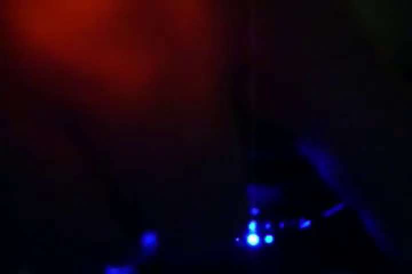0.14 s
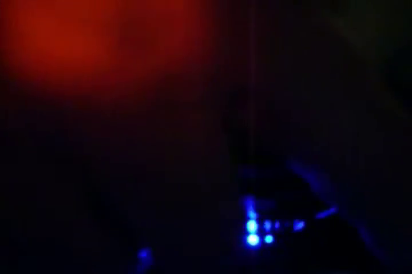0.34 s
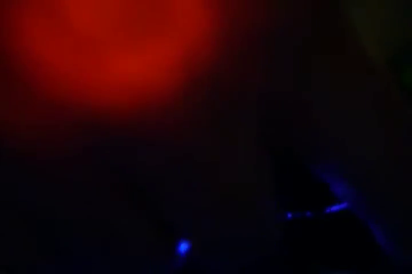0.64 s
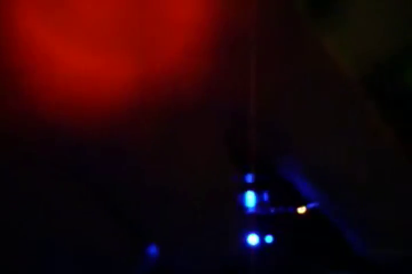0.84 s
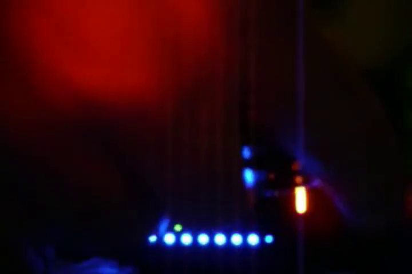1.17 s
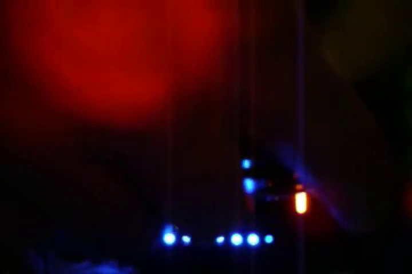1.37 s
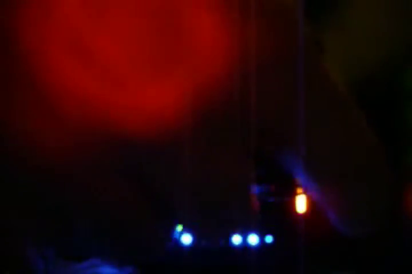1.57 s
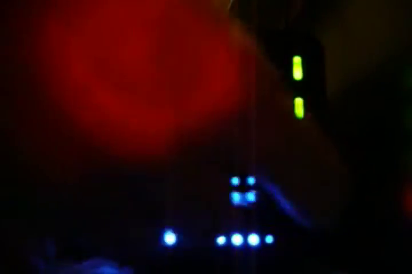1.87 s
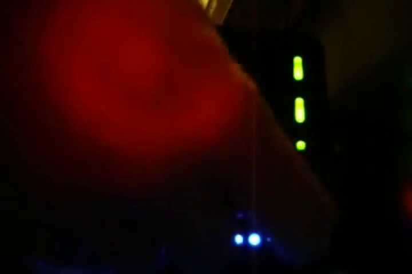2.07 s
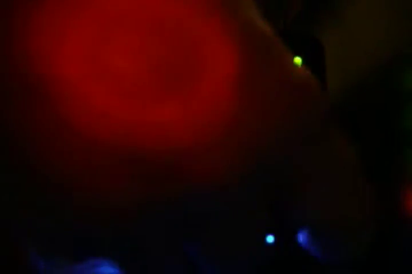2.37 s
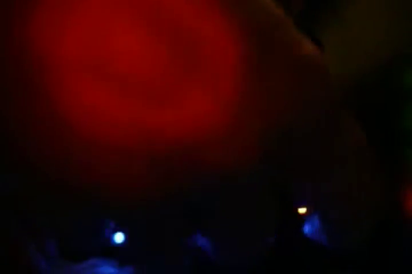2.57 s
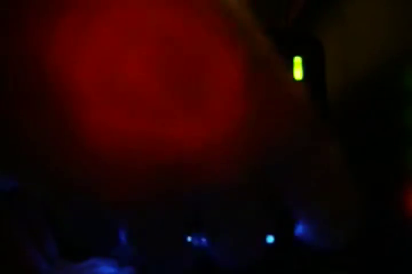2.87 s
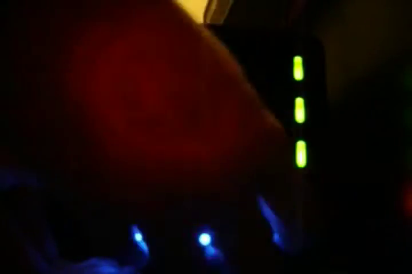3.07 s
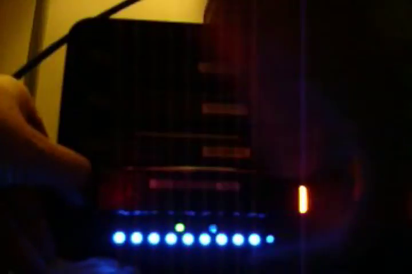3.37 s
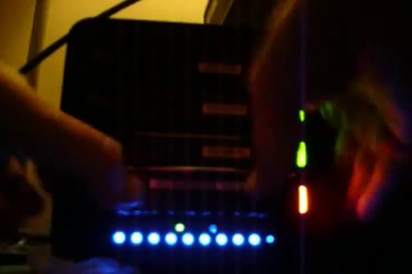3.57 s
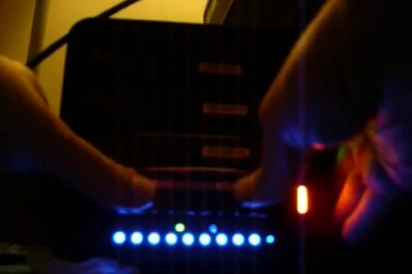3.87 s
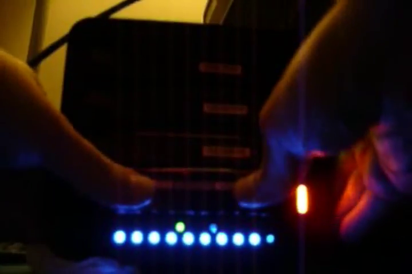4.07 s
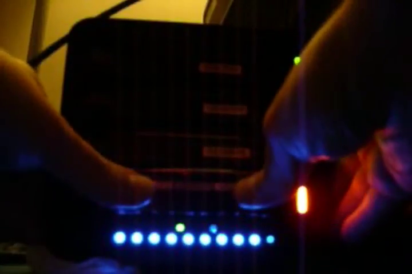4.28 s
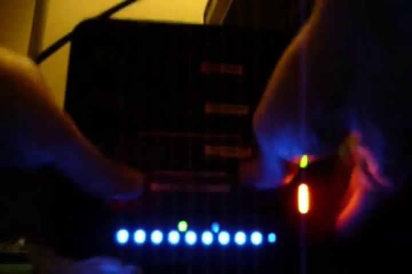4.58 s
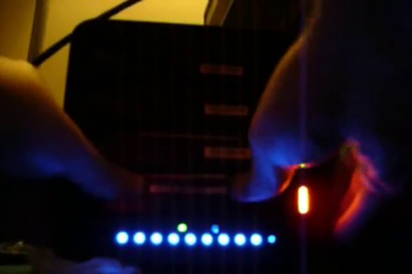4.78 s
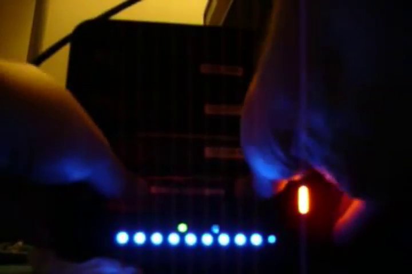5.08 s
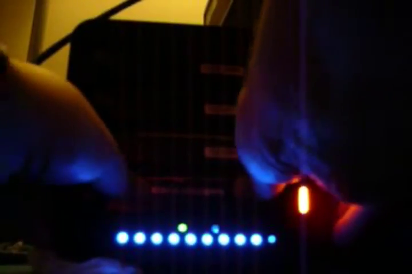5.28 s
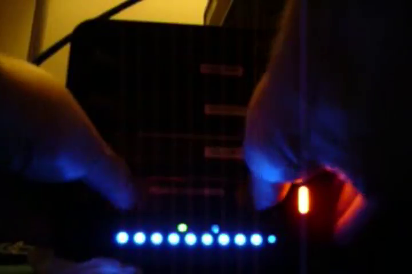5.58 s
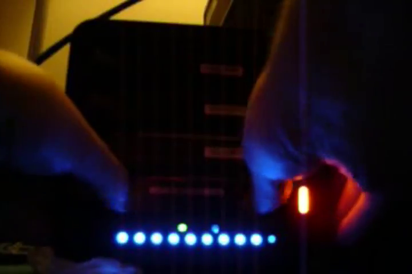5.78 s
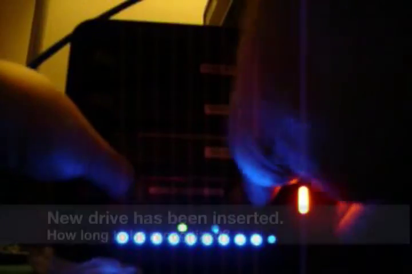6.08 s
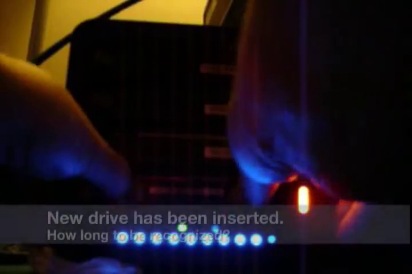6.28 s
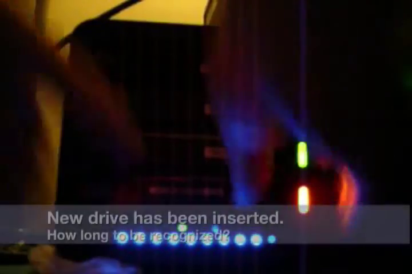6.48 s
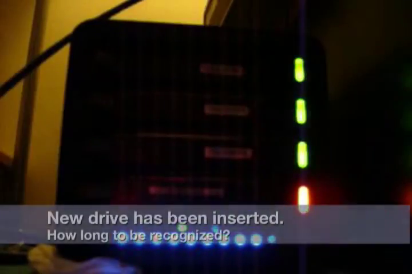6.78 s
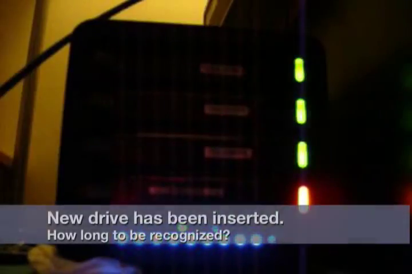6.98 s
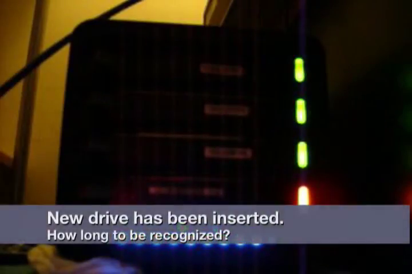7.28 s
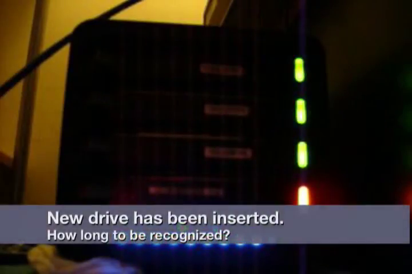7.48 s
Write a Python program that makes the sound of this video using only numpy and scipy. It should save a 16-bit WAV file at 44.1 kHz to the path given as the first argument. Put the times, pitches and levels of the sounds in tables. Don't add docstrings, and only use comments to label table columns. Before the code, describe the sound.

A hard drive is pushed into a plastic and metal bay in clattering, scraping bursts, ending in sharp latch clicks and faint electronic hiss.

```python
import sys
import numpy as np
from scipy import signal
from scipy.fft import rfft, irfft
from scipy.io import wavfile
from scipy.ndimage import uniform_filter1d

SR = 44100
rng = np.random.default_rng(int(sys.argv[2]) if len(sys.argv) > 2 else 0)


def generate_wav(signal):
    frames = np.transpose(np.atleast_2d(signal))
    scaled = np.clip(frames, -1, 1) * 32767
    pcm = np.round(scaled).astype(np.int16)
    wavfile.write(sys.argv[1], SR, pcm)


def invert_db(level):
    return 10 ** (np.asarray(level, dtype=float) / 20)


N = 337001
T = np.arange(N) / SR


def unit(x):
    return x / np.sqrt(np.mean(x ** 2))


def resonance(x, hz, width_hz):
    return signal.lfilter(*signal.iirpeak(hz, hz / width_hz, fs=SR), x)


def ring(push, modes):
    out = 0
    for k, (hz, db, width_hz) in enumerate(modes):
        gain = (-1) ** k * invert_db(db) * np.sqrt(100 / width_hz)
        out = out + gain * resonance(push, hz, width_hz)
    return out


def coloured(shape):
    hz, db = np.transpose(shape)
    log_hz = np.log(np.linspace(1, SR / 2, N // 2 + 1))
    spectrum = rfft(rng.standard_normal(N)) * invert_db(np.interp(log_hz, np.log(hz), db))
    return unit(irfft(spectrum, N))


def walk(rate):
    hold = int(SR / rate)
    levels = rng.standard_normal(N // hold + 1)
    return uniform_filter1d(np.repeat(levels, hold), hold)[:N]


def tones(lines, flutter_db, drift):
    turns = np.cumsum(1 + drift * walk(20)) / SR
    out = 0
    for hz, db in lines:
        level = invert_db(db + flutter_db * walk(19))
        out = out + level * np.sqrt(2) * np.sin(2 * np.pi * hz * turns)
    return out


def grit(rate, scatter_db, count=N):
    hit, size, sign = rng.random((3, count))
    click = invert_db(-scatter_db * np.log(size + 1e-9)) * np.sign(sign - .5)
    return (hit < rate / SR) * click


def strokes(rows, rest_db):
    stroke_db = 15
    db = np.outer(rest_db, np.ones(N))
    for s, swell_s, fade_s, *peak_db in rows:
        span = slice(max(int(s * SR) - SR // 2, 0), int(s * SR) + SR)
        t = T[span] - s
        lost_db = stroke_db * np.where(t < 0, -t / max(swell_s, .003), t / max(fade_s, .003))
        db[:, span] = np.maximum(db[:, span], np.array(peak_db)[:, None] - lost_db)
    return db


# (time [s], pitch [Hz])
MOTOR_PITCH = [
    (0, 2010),
    (.6, 2030),
    (5.8, 1880),
    (7.7, 1913),
]


def motor():
    hz = np.interp(T, *np.transpose(MOTOR_PITCH)) * (1 + 0.016 * walk(60))
    return invert_db(-77 + 3 * walk(40)) * np.sin(2 * np.pi * np.cumsum(hz) / SR)


# (frequency [Hz], level [dB rms])
CAMERA_WHINE = [(840, -85.5), (2719, -74.5), (2869, -80), (5437, -81), (5588, -78), (8156, -87),
                (8306, -80)]
# (frequency [Hz], density [dB per Hz])
CAMERA_HISS = [(12, -28.5), (20, 8), (64, -23.5), (124, -20.5), (348, -20.5), (1490, -20.5), (1890, -18),
               (2340, -22), (2810, -20.5), (5030, -20.5), (5590, -22), (8540, -19), (11100, -33),
               (14500, -53), (22000, -120)]


def camera():
    hiss = invert_db(-64 + 1.1 * walk(2.2)) * coloured(CAMERA_HISS)
    return tones(CAMERA_WHINE, flutter_db=1.5, drift=.00015) + motor() + hiss


# (frequency [Hz], level [dB rms])
DISK_TONES = [(119.6, -48.5), (7208, -62.5), (7424, -63)]
# (frequency [Hz], density [dB per Hz])
FAN_AIR = [(59, -36), (100, -6.5), (124, -11), (195, -22.5), (278, -9), (307, -15.5), (837, -23.5),
           (1370, -25), (6340, -29.5), (7420, -22.5), (11000, -39), (14300, -74.5), (22000, -120)]
# (frequency [Hz], width [Hz], level [dB rms])
DUCT_TONES = [(495, 81, -60), (545.4, 18, -67), (740.4, 25, -64), (832, 34, -57.5), (952, 61, -66.5),
              (1160, 16, -66), (1619, 47, -68)]


def box_hum():
    hum = tones(DISK_TONES, flutter_db=1.5, drift=.0004) + invert_db(-54) * coloured(FAN_AIR)
    for hz, width_hz, db in DUCT_TONES:
        hum = hum + invert_db(db) * unit(resonance(rng.standard_normal(N), hz, width_hz))
    return hum


# (opens [s], starts to close [s])
GATE_SPANS = [
    (.592, .865),
    (.937, 1.105),
    (1.157, 1.335),
    (1.516, 2.14),
    (2.217, 2.37),
    (2.680, 3.735),
    (3.842, 4.01),
    (4.03, 4.355),
    (4.463, 5.415),
    (5.499, 5.655),
]


def gate():
    fall_db_s, floor_db = 157.5, -24.5
    db = np.full(N, floor_db)
    for opens, closes in GATE_SPANS:
        falling = np.clip(-fall_db_s * (T - closes), floor_db, 0)
        db = np.where(T >= opens, falling, db)
    return uniform_filter1d(invert_db(db), size=30)


# (time [s], size [full scale], rise [s])
AIR_PUSHES = [
    (0.595, -0.0019, 0.0031),
    (0.939, 0.077, 0.00024),
    (1.159, 0.066, .0004),
    (1.51, 0.031, 0.0041),
    (2.219, 0.072, 0.00017),
    (3.843, 0.07, 0.00049),
    (4.041, -0.027, 0.0041),
    (4.465, 0.084, 0.00034),
    (4.485, -0.06, 0.002),
    (5.5, 0.068, 0.00038),
]


def pushes():
    steps = np.zeros(N)
    for s, size, rise_s in AIR_PUSHES:
        fast = np.clip((T - s) / rise_s, 0, 1)
        slow = np.clip((T - s) / .022, 0, 1)
        steps += size * (fast + .7 * slow)
    w, damping = 2 * np.pi * 2, .7
    drain = signal.bilinear([1, 0, 0], [1, 2 * damping * w, w * w], fs=SR)
    return signal.lfilter(*drain, steps)


# (frequency [Hz], level [dB], t60 [s])
CASE_MODES = [(163, -3, 0.016), (294.5, -2, 0.051), (388, 5.5, 0.029), (494.7, 2.5, 0.088),
              (578.4, -8, .07), (734, 1, 0.04), (782, 2, 0.054), (858.8, 3, .08), (971, 0.5, 0.03),
              (1095, -4, 0.067), (1257, -8, 0.028), (1513, -10, 0.11)]


def case_modes(tweak_db=0):
    hz, db, t60 = np.transpose(CASE_MODES)
    return zip(hz, db + tweak_db, np.log(1000) / (np.pi * t60))


def struck_case(push, centre_hz):
    hz = np.array(CASE_MODES)[:, 0]
    spot_db = 1.5 * rng.standard_normal(len(hz))
    away_db = 4.84 * np.log2(hz / centre_hz) ** 2
    body = ring(push, case_modes(spot_db - away_db))
    return body / np.abs(body).max()


# (frequency [Hz], width [Hz], level [dB])
TRAY_MODES = [(1550, 200, -7), (1928, 310, 0), (2660, 560, 0.5), (3170, 240, 1), (3700, 490, -2.5),
              (4830, 340, -1), (5600, 480, 1), (6346, 590, 2.5), (7320, 630, 2), (8200, 730, 2),
              (9150, 680, 1)]


def struck_tray(push, top_db):
    hz, width_hz, db = np.transpose(TRAY_MODES)
    tilt_db = top_db * np.clip(np.log2(hz / 3000), 0, 1)
    spot_db = 1.5 * rng.standard_normal(len(hz))
    crack = ring(push, zip(hz, db + tilt_db + spot_db, 1.5 * width_hz))
    return crack / np.abs(crack).max()


# (time [s], crack peak [dB], case peak [dB], case centre [Hz], rattle t60 [s])
METAL_CLACKS = [(1.1586, -45.5, -43, 326, 0.049), (1.5162, -25.5, -24.5, 480, 0.062),
                (1.8807, -25.5, -17.5, 930, 0.1), (1.908, -23, -25, 404, 0.037),
                (2.6906, -13.5, -16.5, 480, 0.035), (2.9906, -36, -22.5, 367, 0.065),
                (3.1492, -27, -22.5, 840, 0.062), (4.0462, -15.5, -16.5, 807, 0.085),
                (4.4788, -5, -12, 980, 0.043), (4.5074, -25, -28.5, 900, .06), (5.016, -3, -30, 390, 0.028)]
# (time [s], crack peak [dB], case peak [dB], case centre [Hz], rattle t60 [s])
PLASTIC_RAPS = [(.5962, -40, -40, 495, 0.094), (.7712, -50, -35.5, 390, 0.035),
                (2.0204, -59, -35, 390, 0.075), (2.68, -24, -23.5, 829, 0.19),
                (2.9017, -55, -28.5, 370, 0.044), (3.1309, -27, -22.5, 950, 0.072),
                (3.238, -22, -18.5, 850, .12), (4.9445, -23.5, -22, 525, 0.075),
                (4.9825, -38.5, -31.5, 787, 0.1), (5.1274, -56, -43, 457, .065),
                (5.1505, -27.5, -27, 455, 0.059)]
# (time [s], crack peak [dB], case peak [dB], case centre [Hz], rattle t60 [s])
DULL_BUMPS = [(.7374, -59, -55, 417, .055), (1.6513, -26.5, -16.5, 596, 0.071),
              (1.7108, -44, -30.5, 440, 0.33), (2.9229, -31.5, -27, 786, 0.087),
              (3.037, -24, -19, 765, 0.076), (3.0494, -30, -20, 400, 0.027), (3.4216, -49, -23, 473, 0.021),
              (4.0342, -16, -26, 760, 0.026), (4.5294, -33.5, -27.5, 740, 0.062),
              (5.2101, -34, -36.5, 775, 0.074)]


def all_knocks():
    found = []
    for rows, top_db in [(METAL_CLACKS, -2.5), (PLASTIC_RAPS, -8.5), (DULL_BUMPS, -21)]:
        for s, crack_db, case_db, centre_hz, t60 in rows:
            found.append((s, crack_db, case_db, top_db, centre_hz, t60))
    return sorted(found)


def knocks():
    out, t = np.zeros(N + SR), T[:SR // 5]
    for s, crack_db, case_db, top_db, centre_hz, t60 in all_knocks():
        fade = invert_db(-60 * t / max(t60, .005))
        rattle = unit(grit(6000, 1.8, count=len(t))) * fade * np.minimum(t / 0.0014, 1)
        first_contact = 1.52 * np.exp(-((t - .0004) / .0001) ** 2)
        rattle = rattle + first_contact
        room = rng.standard_normal(len(t)) * invert_db(-19 - 60 * t / .16)
        body = struck_case(rattle * fade ** 0.47 + room, centre_hz)
        crack = struck_tray(rattle + 0.53 * room, top_db)
        i = int(s * SR)
        out[i:i + len(t)] += invert_db(case_db + 7.5) * body + invert_db(crack_db + 2.5) * crack
    return out[:N]


# (time [s], snap peak [dB], case level over snap [dB], contact [ms], case centre [Hz])
SHARP_TICKS = [(0.597, -28, 5.5, 0.48, 877), (1.6516, -5.5, -10.5, 0.2, 365),
               (2.6817, -1.5, -12, 0.29, 761), (2.9249, -18, -5, 0.21, 794), (3.037, -25, 4.5, 0.081, 503),
               (3.0896, -32.5, 11, 0.23, 335.3), (3.1287, -20.5, 7, 0.1, 471),
               (3.4222, -10.5, -4, 0.52, 479), (3.4346, -27.5, 12.5, 0.095, 490),
               (3.6287, -23.5, -29, 0.042, 360), (4.035, -14.5, 2.5, 0.1, 795),
               (4.4794, -23, 4.5, 0.089, 853), (4.9833, -32.5, 17, 0.12, 791), (5.0162, 1, -29, 0.067, 391)]


def ticks():
    out, t = np.zeros(N + SR), T[:SR // 5]
    for s, snap_db, case_db, contact_ms, centre_hz in SHARP_TICKS:
        scatter = rng.standard_normal(len(t)) * invert_db(-60 * t / 0.014)
        blow = (t == 0) + 0.037 * scatter
        top_hz = np.clip(500 / contact_ms, 1200, 12000)
        snap = signal.lfilter(*signal.butter(3, top_hz, fs=SR), blow)
        snap = signal.lfilter(*signal.butter(1, 250, "high", fs=SR), snap)
        snap = snap / np.abs(snap).max()
        i = int(s * SR)
        out[i:i + len(t)] += invert_db(snap_db) * (snap + invert_db(case_db) * struck_case(blow, centre_hz))
    return out[:N]


def duck():
    from_db, share, recover_s = -16, 0.26, 0.2
    db = np.zeros(N)
    for s, crack_db, case_db, *_ in all_knocks():
        depth_db = share * max(max(crack_db, case_db) - from_db, 0)
        span = slice(int(s * SR), int(s * SR) + SR)
        db[span] = np.minimum(db[span], -depth_db * np.exp(-T[:SR] / recover_s))
    return invert_db(db)


# (peak time [s], swell [s], fade [s], sway level [dB], thud level [dB])
TABLE_JOLTS = [(.636, .07, .09, -30, -37), (.808, .12, .07, -35, -52), (.98, .03, .1, -47.5, -62),
               (1.25, .12, .15, -41.5, -50.5), (1.522, 0.011, 0.07, -31, -37.5),
               (1.65, .04, .1, -46.5, -28.5), (1.936, .1, .04, -45, -30.5), (2.096, .12, .06, -43, -42.5),
               (2.34, .1, .08, -42.5, -64), (2.7, .03, .1, -31.5, -32.5), (2.854, .1, .06, -47, -41),
               (2.95, .09, .3, -58, -26), (3.22, .3, .08, -53.5, -31), (3.422, .06, .13, -42.5, -37),
               (3.644, .15, .12, -38, -43), (4.058, 0.037, .07, -34, -27.5), (4.49, .03, .1, -31, -32.5),
               (4.64, .1, .15, -41.5, -58), (4.96, .08, .1, -33.5, -30.5), (5.156, .05, .07, -39.5, -35),
               (5.33, .15, 0.11, -48, -50), (5.55, .05, .05, -44, -55), (6.872, 0.043, .15, -41.5, -47),
               (7.5, .3, .3, -51.5, -53.5)]


def hands():
    sway = resonance(rng.standard_normal(N), 32, 22)
    low_thud = resonance(rng.standard_normal(N), 75, 50)
    high_thud = resonance(resonance(rng.standard_normal(N), 165, 130), 165, 130)
    sway_db, thud_db = strokes(TABLE_JOLTS, [-52.5, -63.5])
    return invert_db(sway_db) * unit(sway) + invert_db(thud_db) * unit(low_thud + .9 * high_thud)


# (peak time [s], swell [s], fade [s], case level [dB], rub level [dB])
RAIL_STROKES = [(.745, .012, 0.14, -39, -61), (.795, 0.091, 0.051, -33.5, -57),
                (1.016, 0.14, .15, -48.5, -57), (1.3, 0.29, 0.1, -47.5, -57.5),
                (1.688, 0.25, .15, -37, -49), (1.87, 0.045, 0.077, -22.5, -34.5),
                (1.96, .02, 0.16, -39.5, -51), (2.272, 0.14, 0.059, -50, -59),
                (2.82, 0.051, 0.17, -35, -45), (2.966, 0.15, 0.38, -32, -39.5),
                (3.13, .015, 0.19, -24.5, -40.5), (3.075, .08, 0.25, -30.5, -50),
                (3.29, 0.24, 0.044, -31, -60), (3.45, 0.22, 0.87, -49, -55), (3.845, .01, .04, -46, -52),
                (4.045, 0.034, 0.26, -41, -52.5), (4.3, 0.36, 0.082, -44.5, -54),
                (4.9, 0.66, 0.9, -46, -57.5), (5.2, 0.07, 0.14, -39, -63), (5.29, .08, 0.17, -43, -51),
                (5.39, 0.089, 0.056, -41.5, -50), (5.51, 0.012, 0.053, -51.5, -55.5)]


def sliding():
    rest_case_db, rest_rub_db = -64.5, -62.5
    slips = grit(2000, 2.6) * invert_db(3.3 * walk(50))
    fine = grit(5000, 2.3) * invert_db(3 * walk(70))
    tray = [(hz, db, 1.4 * width_hz) for hz, width_hz, db in TRAY_MODES]
    case = unit(ring(slips, case_modes()))
    rub = unit(ring(fine, tray[:6]))
    hiss = unit(ring(fine, tray[6:]))
    case_db, rub_db = strokes(RAIL_STROKES, [rest_case_db, rest_rub_db])
    hiss_db = -61 + 0.69 * (rub_db - rest_rub_db)
    return invert_db(case_db) * case + invert_db(rub_db) * rub + invert_db(hiss_db) * hiss


# (time [s], level [dB])
PANEL_LEVELS = [
    (3.425, -32.5),
    (3.444, -25.5),
    (3.49, -45.5),
    (3.669, -41),
    (3.701, -40.5),
    (3.769, -53),
    (3.795, -66.5),
    (4.035, -45.5),
]


def panel():
    s, db = np.transpose(PANEL_LEVELS)
    level = invert_db(np.interp(T, s, db, left=-120, right=-120))
    phase = 2 * np.pi * np.cumsum(275 * (1 + 0.0029 * walk(28))) / SR
    return level * np.sqrt(2) * (np.sin(phase) + 0.17 * np.sin(2 * phase))


# (time [s], depth [dB])
SUPPLY_SAGS = [
    (6.212, -6),
    (6.32, -5.5),
    (6.472, -7),
]


def sags():
    return invert_db(sum(db * np.exp(-((T - s) / .012) ** 2) for s, db in SUPPLY_SAGS))


def scene():
    ducking = duck()
    gated = (box_hum() * ducking + sliding() * ducking + hands()) * gate()
    moving = knocks() + ticks() + panel()
    return (moving + sags() * (gated + camera()) + pushes())[None]


def top_cut(x):
    return signal.sosfilt(signal.butter(12, 11270, fs=SR, output="sos"), x)


def record(dry):
    low_pass = signal.ellip(8, .3, 60, 10500, fs=SR, output="sos")
    cut = signal.sosfilt(low_pass, dry)
    mix = 0.58 * np.tanh(cut / 0.67)
    return top_cut(mix)


dry = scene()
out = record(dry)
generate_wav(out)
```